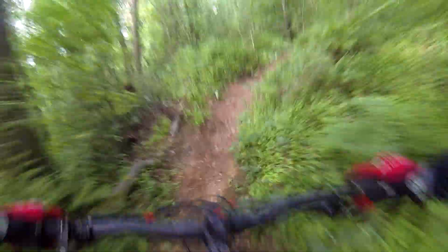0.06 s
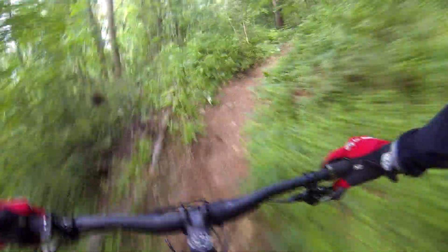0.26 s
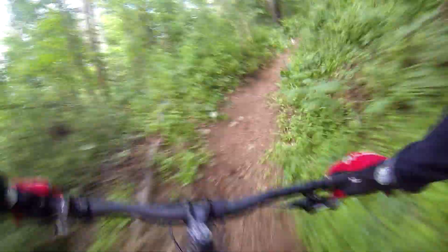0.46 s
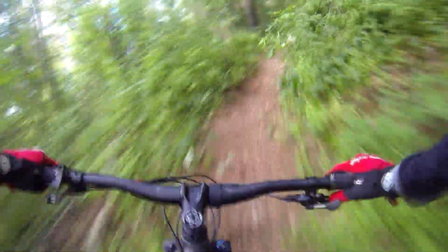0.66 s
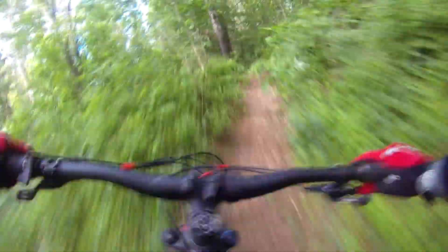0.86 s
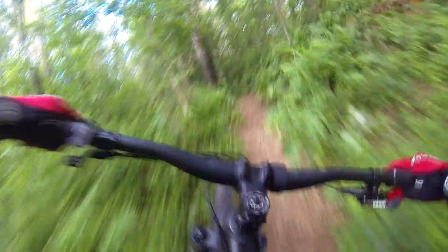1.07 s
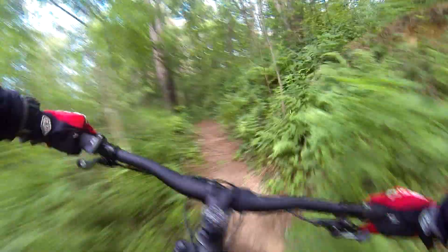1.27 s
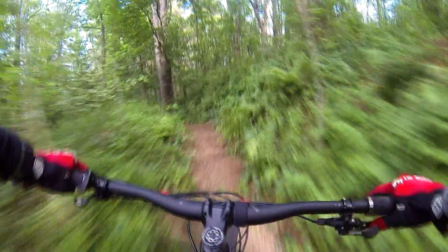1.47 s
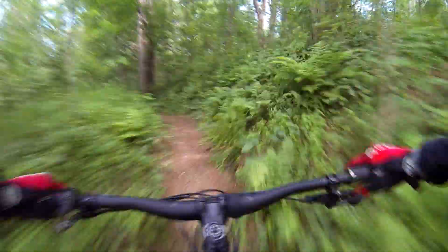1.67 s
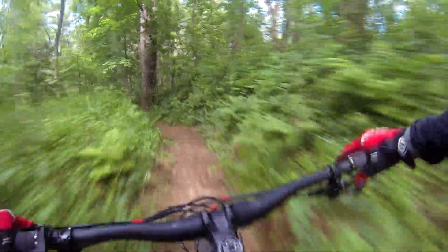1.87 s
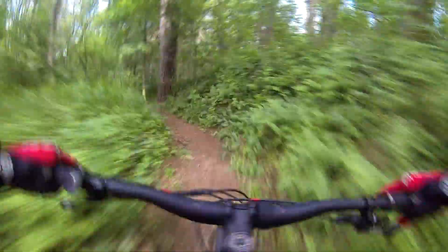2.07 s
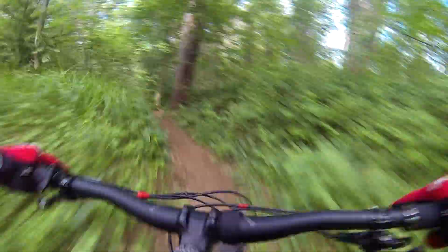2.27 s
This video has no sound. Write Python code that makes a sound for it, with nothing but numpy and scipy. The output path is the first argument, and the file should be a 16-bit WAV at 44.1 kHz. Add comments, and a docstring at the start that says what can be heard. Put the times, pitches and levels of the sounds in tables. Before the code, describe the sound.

A mountain bike rolls along a dirt trail, heard close from the rider's chest. The shifter clicks twice, a hard knock follows, then two more clicks, over fast drivetrain ticking, tyre crunch, small rattles and low wind buffets.

```python
"""A mountain bike rolls down a dirt trail, heard from the rider's chest.
From the start the drivetrain ticks, tyres crunch and wind buffets; bumps thud and loose parts rattle.
At 0.4 s the shifter is pressed and released, each snap exciting its modes; at 0.6 s a hard knock
rings the frame. A second pair of clicks begins at 1.15 s. Near 1.6 s the bike scuffs through dirt
and leaves, and the ticking dies away."""
import sys
import numpy as np
from scipy import signal
from scipy.io import wavfile
from scipy.ndimage import uniform_filter1d

SR = 44100
rng = np.random.default_rng(int(sys.argv[2]) if len(sys.argv) > 2 else 0)


def dump_mix(stems):
    """Bounce the given channels to the path in sys.argv[1] as a 16-bit WAV at rate SR."""
    frames = np.atleast_2d(stems).T  # one column per channel
    limited = np.clip(frames, -1, 1)  # hard clip at full scale
    pcm = np.round(limited * 32767).astype(np.int16)
    wavfile.write(sys.argv[1], SR, pcm)


N = 101429
TIME = np.arange(N) / SR

# modes of small struck objects, loose parts and grit alike: f/Hz, gain/dB, T60/s
SMALL_PART_MODES = [(1350, -7.5, 0.015), (1678, -3, 0.02), (1965, -3.5, 0.0053), (2494, -1, 0.0092),
                    (2850, 0.5, 0.009), (3960, -11, 0.0041)]


def shifter():
    """Impact excitation: a catch slides, snaps in and rebounds, ringing itself, housing and spring."""
    # clicks: t/s, relative level/dB, slide length/s, slide gain/dB, first rebound delay/s, gain/dB,
    # second rebound delay/s, gain/dB, housing gain/dB, spring gain/dB, spring f/Hz (set by its tension)
    clicks = [(.3862, -17, 0.0006, -6, 0.00093, -2.2, .00183, -5, -0.5, -14, 5100),
              (.5006, -24.5, .0014, -1.5, .00119, 1, 0.0014, -11.5, 2, -2, 4839),
              (1.1462, -20, .0018, -5, 0.00019, -6, 0.0012, -7.5, -0.5, -7, 4778),
              (1.2797, -26, 0.0019, -7, 0.00096, -9, .00179, -18, 2, 4.5, 4730)]
    # modes of the metal catch and of the housing: f/Hz, gain/dB, T60/s
    catch_modes = [(5080, -15.5, 0.022), (6110, -3.5, 0.0093), (6650, -2.5, 0.0063), (7240, -0.3, 0.0092),
                   (8270, -8, 0.0064), (8960, -8, 0.0072), (10040, -10.5, 0.0054), (10500, -13.5, 0.0075),
                   (12528, -21, 0.0054), (13600, -20, 0.0048)]
    housing_modes = [(1565, -11.5, 0.018), (1910, -13.1, 0.0221), (2290, -18.5, 0.028),
                     (2930, -15.5, 0.018), (3540, -14, 0.012), (4040, -14.5, 0.017)]
    chatter_db, tail_db = -20.5, -39
    catch_force, housing_force, spring = 0, 0, 0
    for (s, db, slide_s, slide_db, first_s, first_db, second_s, second_db,
         housing_db, spring_db, spring_hz) in clicks:
        snap = impulses(s, db)
        sliding = (TIME > s - slide_s) & (TIME < s)
        slide = from_db(db + slide_db + chatter_db) * sliding * rng.standard_normal(N)
        force = snap + slide
        force += from_db(first_db) * delayed(snap, first_s)
        force += from_db(second_db) * delayed(snap, second_s)
        force += from_db(chatter_db) * chatter(snap, t60=0.018)
        force += from_db(tail_db) * chatter(snap, t60=0.069)
        catch_force += force
        housing_force += from_db(housing_db) * force
        spring += ring(force, [(spring_hz, spring_db - 7.5, 0.024)])
    crack = from_db(-3.5) * highpass(catch_force, hz=1700, order=2)  # the bare contact
    vibration = crack + ring(catch_force, catch_modes) + ring(housing_force, housing_modes) + spring
    return from_db(-12) * small_part_bass_cut(vibration)


def knocks():
    """Modal response: blows from the ground ring the frame; a heavy one also drives its low modes."""
    # blows: t/s, level/dB, thud gain/dB
    blows = [(0.4724, -42.5, -23), (0.5864, -20.5, -2.5)]
    # high and low modes of the frame: f/Hz, gain/dB, T60/s
    high_modes = [(494, -21.5, 0.023), (1010, -12, 0.013), (1240, -13.5, 0.014), (1430, -11, 0.013),
                  (1790, -16.5, 0.015), (2087, -26.5, 0.04), (2950, -22.5, 0.011), (3380, -25.5, 0.026),
                  (4280, -24.5, 0.01)]
    low_modes = [(114, 5.5, 0.058), (172.6, 2.5, 0.043), (242.6, -8, 0.048), (387, -11.5, 0.021)]
    s, db, thud_db = np.transpose(blows)
    hits = impulses(s, db)
    force = hits + from_db(-24) * chatter(hits, t60=0.018)
    return ring(force, high_modes) + ring(impulses(s, db + thud_db), low_modes)


def bumps():
    """Vibration isolation: the suspension softens each bump to a thud, the deeper the slower."""
    # thuds: peak t/s, level/dB, f/Hz
    thuds = [(0.157, -35, 71), (0.625, -25.5, 55), (0.811, -37.5, 127), (0.821, -30.5, 43.7),
             (.893, -18, 22.5), (.945, -49, 114), (1.121, -33, 74.5), (1.318, -44, 85.5), (1.595, -34, 85),
             (2.052, -33, 64.6), (2.259, -45.5, 89)]
    width_cycles = 0.41
    out = 0
    for s, db, hz in thuds:
        cycles = (TIME - s) * hz
        envelope = from_db(db) / np.cosh(np.clip(cycles / width_cycles, -20, 20))
        out += envelope * np.cos(2 * np.pi * cycles)
    return out


def drivetrain():
    """Quasi-periodic excitation: teeth tick past at a slightly uneven rate and ring the metal."""
    # ticking: t/s, tick rate/Hz, level/dB
    ticking = [(0, 48, -51.5), (.33, 50, -50), (.52, 52, -53), (.6, 66, -53.5), (.88, 66, -46.5),
               (1.1, 67, -55.5), (1.35, 60, -54), (1.7, 62, -61.5), (2.3, 52.9, -86)]
    # drivetrain modes: f/Hz, gain/dB, T60/s
    modes = [(2970, -7, 0.0091), (4300, -3.5, 0.0053), (4770, -9, 0.015), (4950, -4.5, 0.021),
             (5780, -18, 0.0087), (7140, -12.5, 0.0094), (8800, -14.5, .006), (10330, -16, 0.0079),
             (11940, -8.5, 0.0052)]
    jitter_teeth, spread_db = 0.067, 2
    rate, db = in_time(ticking)
    teeth_passed = np.cumsum(rate) / SR
    timing, strength = rng.standard_normal((200, 2)).T
    due = np.arange(len(timing)) + 0.5 + jitter_teeth * timing
    reached = due < teeth_passed[-1]
    hits = impulses(np.interp(due[reached], teeth_passed, TIME), spread_db * strength[reached])
    force = from_db(-8) * hits + rough_contact(hits, t60=0.029)
    return from_db(db) * ring(force, modes)


def rattles():
    """Rough impacts: loose cables and chain tap the frame, each tap with a short rasp."""
    # taps: t/s, level/dB
    taps = [(0.095, -50.5), (0.29, -54.5), (.354, -55), (0.66, -51.5), (0.685, -51), (0.817, -48),
            (0.844, -45), (0.863, -56), (0.919, -55), (1.119, -51), (1.125, -44), (1.167, -49),
            (1.3092, -39), (1.407, -55), (1.837, -59.5), (1.877, -54)]
    hits = impulses(*np.transpose(taps))
    force = hits + from_db(-4.5) * rough_contact(hits, t60=0.0096)
    return small_part_bass_cut(ring(force, SMALL_PART_MODES))


def scuffs():
    """Friction noise: a gritty swish through dirt and leaves swells and fades."""
    # Gaussian swells: peak t/s, level/dB, rise width/s, fall width/s
    swells = [(1.554, -63, .011, 0.015), (1.606, -50.5, 0.015, .024), (1.694, -65, 0.018, 0.021)]
    # swish spectrum: f/Hz, relative density/dB
    spectrum = [(250, -5), (400, 9), (490, -9.5), (620, 11), (1000, -21), (1550, 5.5), (2100, -2.5),
                (2850, -7.5), (3700, -5), (5000, -9.5), (7500, -10.5), (10500, -16), (15000, -43)]
    envelope = 0
    for s, db, rise, fall in swells:
        width = np.where(TIME < s, rise, fall)
        envelope += from_db(db) * np.exp(-((TIME - s) / width) ** 2 / 2)
    swish = banded_noise(spectrum, flicker_db=2.5, flicker_hz=87)
    return envelope * (swish + from_db(-3) * grit(per_s=250))


def tyres():
    """Rolling noise: the tread rumbles and hisses on rough dirt while grit cracks under it."""
    # envelopes of crunch and rumble: t/s, level/dB
    crunch_levels = [(0, -62.5), (.18, -65.5), (.32, -63), (.5, -60.5), (.65, -59.5), (.75, -61.5),
                     (.87, -57), (.96, -62), (1.03, -58), (1.09, -62), (1.14, -56.5), (1.23, -63.5),
                     (1.38, -63), (1.5, -66.5), (1.68, -70.5), (1.78, -66.5), (2.0, -67.5), (2.3, -65)]
    rumble_levels = [(0, -59.5), (.4, -56.5), (.55, -53), (.64, -47), (.72, -61), (.8, -52), (.95, -58.5),
                     (1.05, -59.5), (1.45, -62), (1.7, -58), (1.9, -62), (2.3, -64)]
    # their spectra: f/Hz, relative density/dB
    crunch_spectrum = [(800, -5), (1150, -9.5), (1600, 5.5), (2100, 1), (2800, 2), (3700, -5.5), (5000, -6),
                       (7000, -14.5), (11000, -11), (15000, -30)]
    rumble_spectrum = [(40, 4.5), (70, -4), (115, 0.5), (170, -12.5), (250, -16), (400, -20.5), (600, -26),
                       (900, -42)]
    hiss = banded_noise(crunch_spectrum, flicker_db=3.0, flicker_hz=26)
    crunch = hiss + from_db(-17) * grit(per_s=250)
    rumble = banded_noise(rumble_spectrum, flicker_db=3.5, flicker_hz=21)
    return gain_curve(crunch_levels) * crunch + gain_curve(rumble_levels) * rumble


def grit(per_s):
    """Shot noise: bits of dirt crack at random times with uneven strength; rms 1."""
    strength_db = np.minimum(rng.exponential(1, N), 4)
    hits = from_db(strength_db) * (rng.random(N) < per_s / SR)
    return rms_one(ring(rough_contact(hits, t60=0.0049), SMALL_PART_MODES))


def wind():
    """Turbulent pressure: slow eddies push on the microphone in gusts, over a faint rush of air."""
    # gusts: t/s, level/dB
    gusts = [(0, -31), (.18, -40.5), (.26, -29), (.46, -32.5), (.56, -34), (.63, -22), (.7, -35.5),
             (.78, -33), (.89, -18), (.96, -35.5), (1.06, -36.5), (1.22, -33.5), (1.36, -43.5), (1.46, -32),
             (1.55, -47), (1.69, -32.5), (1.84, -37.5), (2.3, -38)]
    # spectra of the eddies and the rush: f/Hz, relative density/dB
    eddy_spectrum = [(10, -9), (14, 6), (24, -5), (34, -16), (48, -20.5), (68, -33)]
    rush_spectrum = [(150, -0.5), (250, -2.5), (400, -5), (650, -9.5), (1000, -13.5), (1400, -11)]
    eddies = banded_noise(eddy_spectrum, flicker_db=-1.5, flicker_hz=11)
    power = np.abs(signal.hilbert(eddies)) ** 2 / 2
    local_rms = np.sqrt(uniform_filter1d(power, size=4500))
    rush = banded_noise(rush_spectrum, flicker_db=1.5, flicker_hz=23)
    return gain_curve(gusts) * eddies / local_rms + from_db(-69.5) * rush


def jingle():
    """Random forcing: constant shaking keeps small metal parts ringing faintly."""
    # envelope: t/s, level/dB
    levels = [(0, -75), (1.1, -76), (1.3, -72.5), (1.345, -66), (1.39, -77), (1.46, -81), (1.48, -66),
              (1.505, -88), (1.545, -67.5), (1.62, -74), (1.75, -73.5), (2.0, -78.5), (2.3, -75.5)]
    # modes of the metal parts: f/Hz, gain/dB, T60/s
    modes = [(4920, -1.5, 0.017), (6800, -2, 0.012), (7610, 2, 0.0081), (8860, -5, 0.015),
             (10140, -1.5, 0.0085), (11020, -4, .012)]
    return gain_curve(levels) * rms_one(ring(rng.standard_normal(N), modes))


def ring(force, modes):
    """Modal superposition: a force drives damped resonators in parallel, signs alternating."""
    out = 0
    for k, (hz, db, t60) in enumerate(modes):
        r, w = decay_per_sample(t60), 2 * np.pi * hz / SR
        mode = signal.lfilter([0, np.sin(w)], [1, -2 * r * np.cos(w), r * r], force + 1e-18)
        out += (-1) ** k * from_db(db) * mode
    return out


def chatter(hits, t60):
    """Exponential decay: each impulse becomes a dying spray of tiny contacts."""
    envelope = signal.lfilter([1], [1, -decay_per_sample(t60)], hits + 1e-18)
    return envelope * rng.standard_normal(N)


def rough_contact(hits, t60):
    """Energy conservation: chatter scaled to carry the energy of its impulse."""
    return chatter(hits, t60) * np.sqrt(2 * np.log(1000) / (t60 * SR))


def small_part_bass_cut(x):
    """Bass cut: these small parts sound only above about 1.1 kHz."""
    return highpass(x, hz=1100, order=4)


def banded_noise(spectrum, flicker_db, flicker_hz):
    """Amplitude modulation: third-octave bands of noise flicker independently; rms 1."""
    hz, db = np.transpose(spectrum)
    edges = 10 * 2 ** (np.arange(33) / 3)
    white = rng.standard_normal((2, N + SR))
    out = 0
    for k, (low, high) in enumerate(zip(edges, edges[1:])):
        flicker = flicker_db * drift(flicker_hz)
        if high > hz[0] and low < hz[-1]:
            bandpass = signal.butter(2, [low, high], "band", fs=SR, output="sos")
            band = signal.sosfilt(bandpass, white[k % 2])[SR:]
            centre_db = np.interp(np.log(low * high) / 2, np.log(hz), db)
            out += band * from_db(centre_db + flicker)
    return rms_one(out)


def drift(hz):
    """Low-passed noise: a smooth random wander of rms 1."""
    step = 40  # samples
    r = np.exp(-2 * np.pi * hz * step / SR)
    white = rng.standard_normal(N // step + 2002)
    slow = signal.lfilter([1], [1, -2 * r, r * r], white)[2000:]
    return np.interp(np.arange(N) / step, np.arange(len(slow)), rms_one(slow))


def impulses(s, db):
    """Ideal impacts at the given times and levels."""
    out = np.zeros(N)
    samples = (np.asarray(s) * SR).astype(int)
    np.add.at(out, np.clip(samples, 0, N - 1), from_db(db))
    return out


def delayed(x, s):
    """Circular delay by s seconds."""
    return np.roll(x, int(round(s * SR)))


def highpass(x, hz, order):
    """Butterworth attenuation below hz."""
    return signal.sosfilt(signal.butter(order, hz, "high", fs=SR, output="sos"), x)


def decay_per_sample(t60):
    """Damping factor that loses 60 dB in t60 seconds."""
    return np.exp(-np.log(1000) / (t60 * SR))


def in_time(rows):
    """Linear interpolation of each column over the times in the first."""
    s, *columns = np.transpose(rows)
    return [np.interp(TIME, s, column) for column in columns]


def gain_curve(levels):
    """Amplitude envelope through points of time and level."""
    return from_db(in_time(levels)[0])


def from_db(db):
    """Decibels to amplitude ratio."""
    return 10 ** (np.asarray(db) / 20)


def rms_one(x):
    """Normalisation to unit rms."""
    return x / np.sqrt(np.mean(x ** 2) + 1e-20)


def scene():
    """Superposition: bike, ground and air add at one microphone."""
    bike = shifter() + drivetrain() + bumps() + knocks() + rattles() + jingle()
    return (bike + tyres() + scuffs() + wind())[None]


def record(dry):
    """Band limiting: a steep elliptic low-pass removes the highest treble."""
    cutoff_hz = 15600
    return signal.sosfilt(signal.ellip(10, .1, 80, cutoff_hz, fs=SR, output="sos"), dry)


dry = scene()
out = record(dry)
dump_mix(out)
```